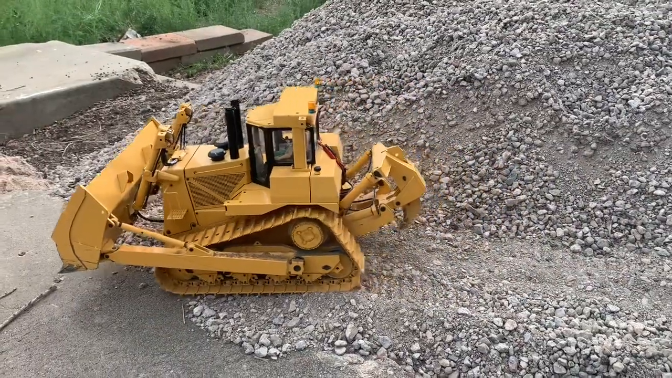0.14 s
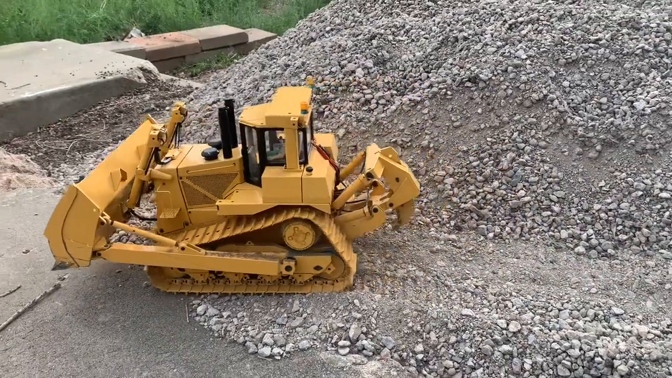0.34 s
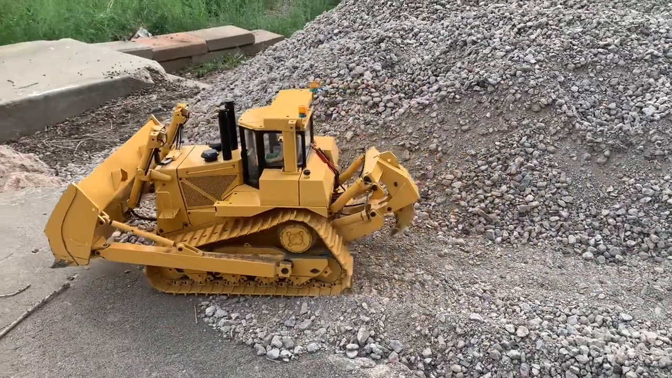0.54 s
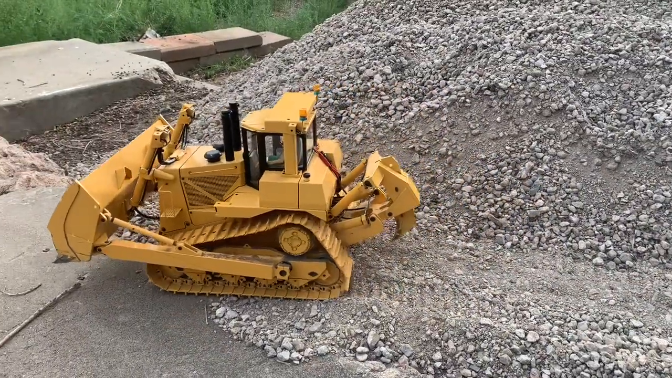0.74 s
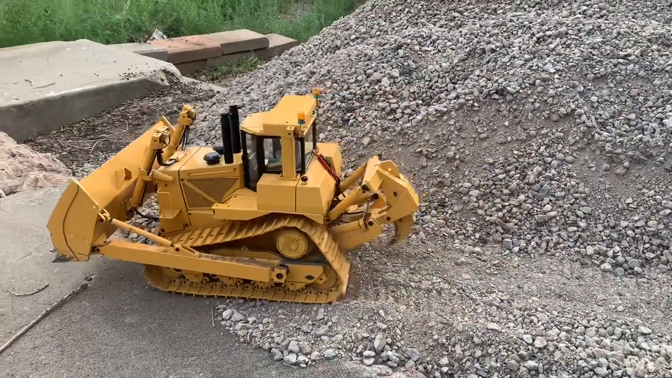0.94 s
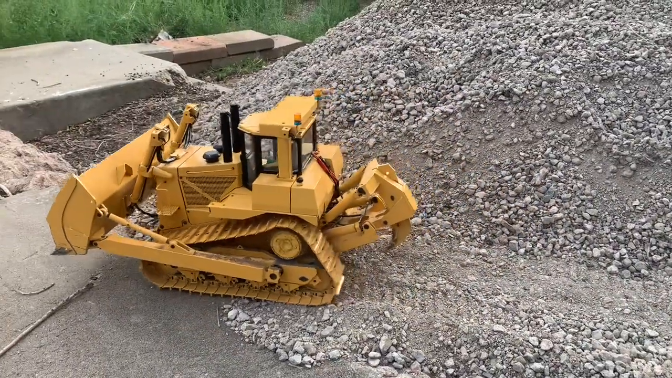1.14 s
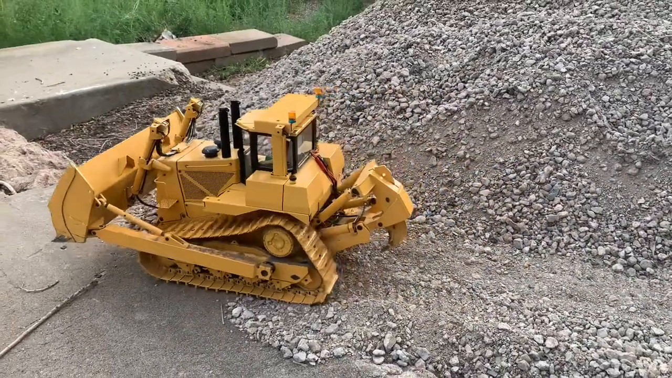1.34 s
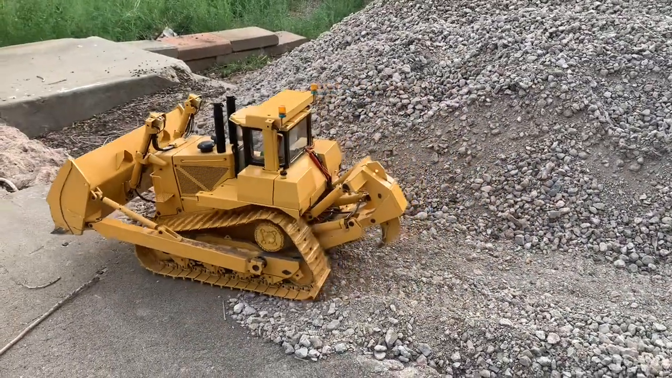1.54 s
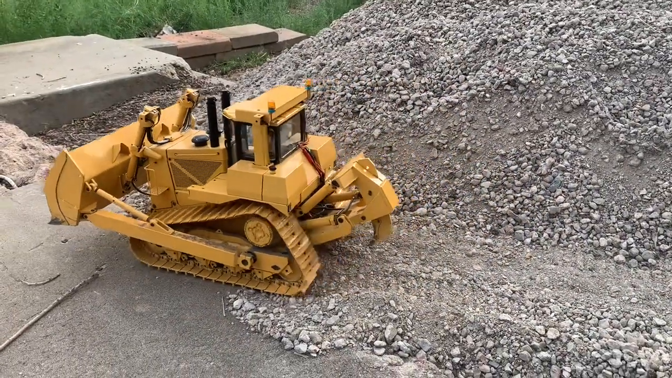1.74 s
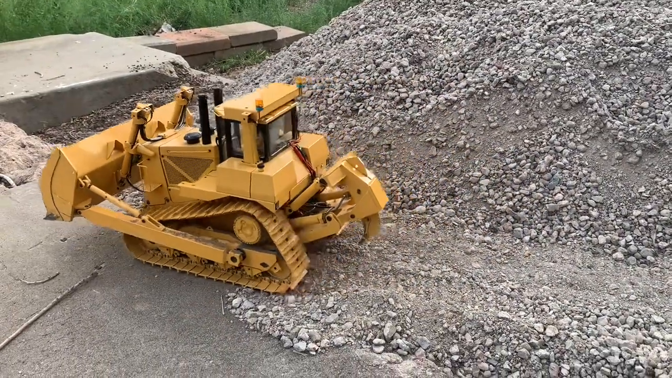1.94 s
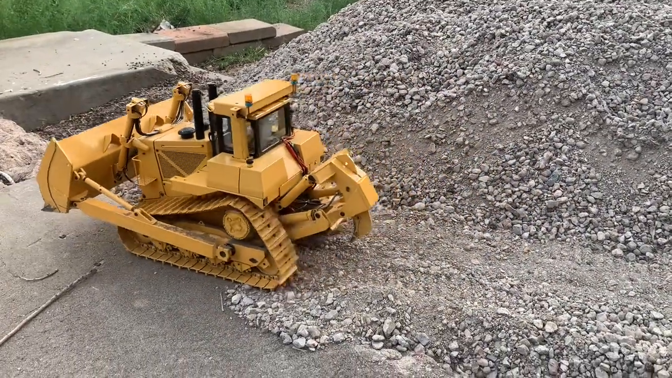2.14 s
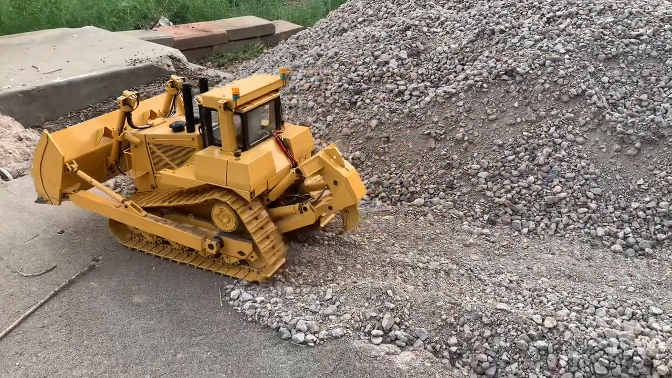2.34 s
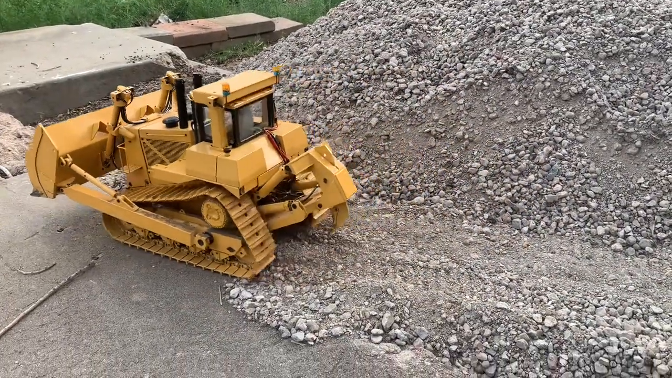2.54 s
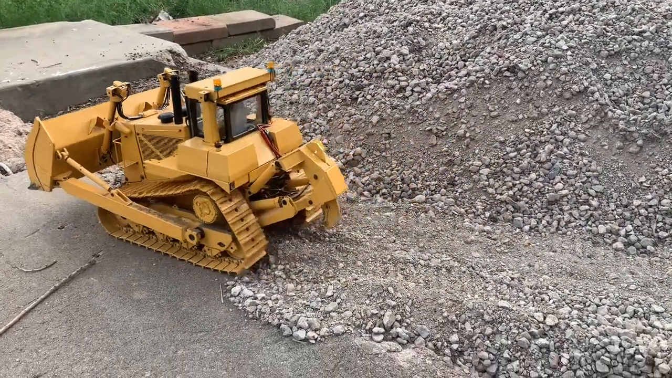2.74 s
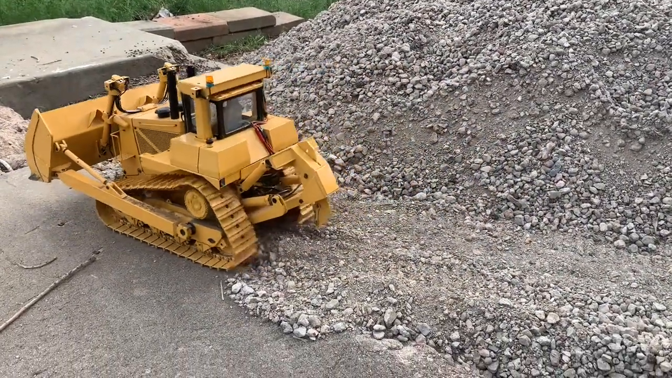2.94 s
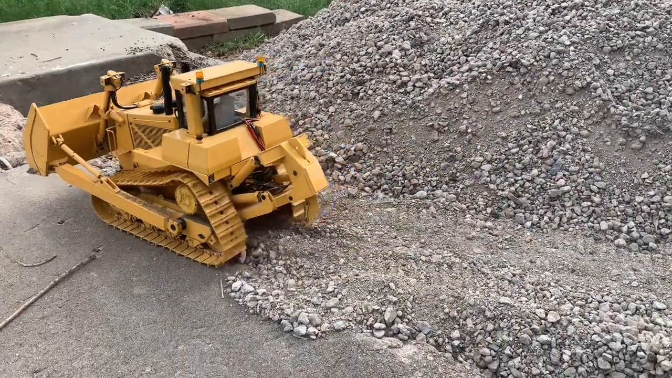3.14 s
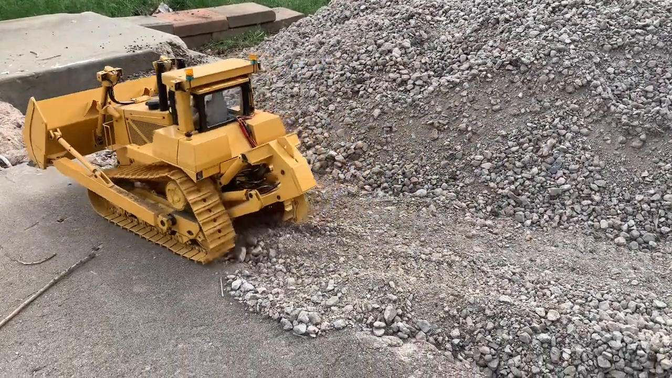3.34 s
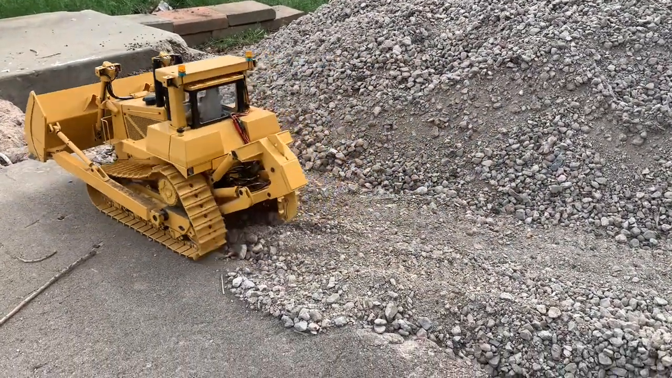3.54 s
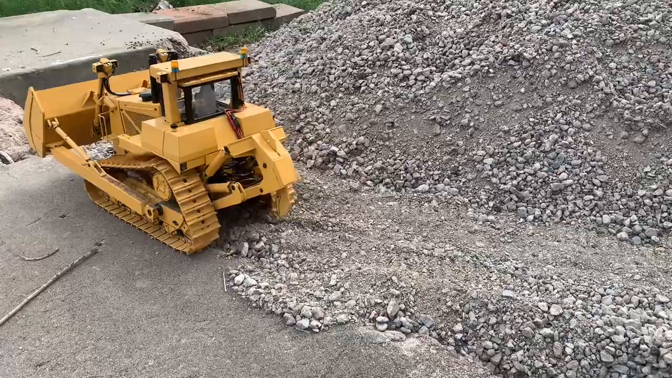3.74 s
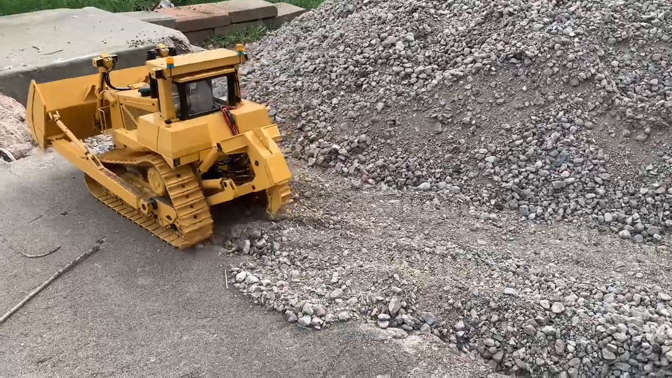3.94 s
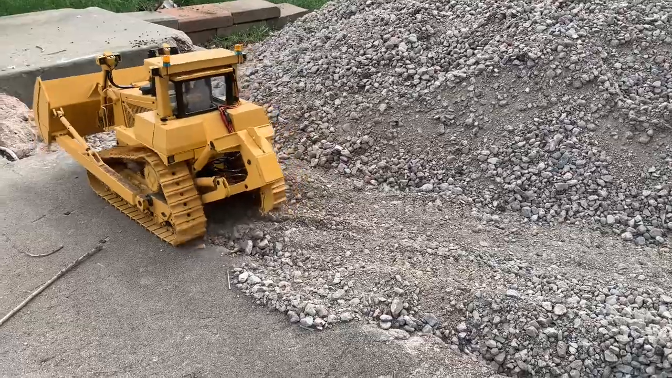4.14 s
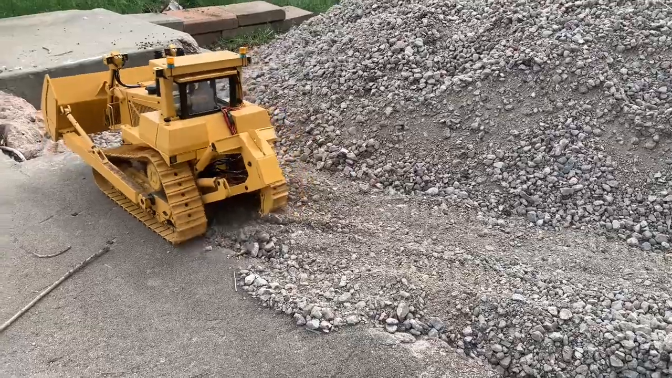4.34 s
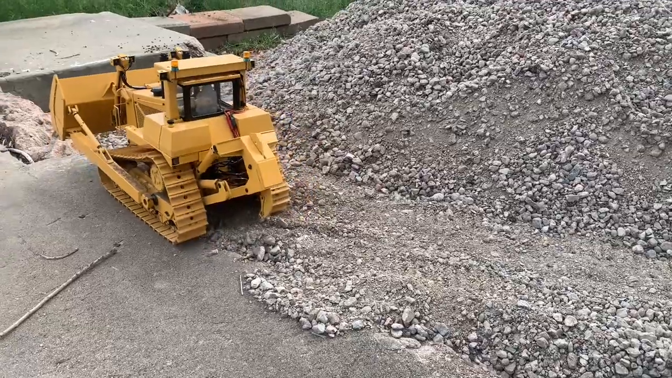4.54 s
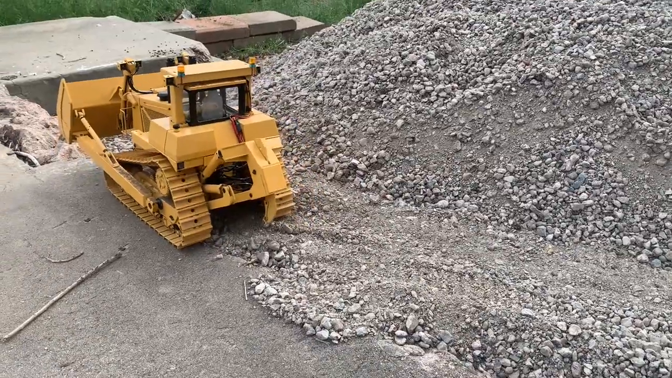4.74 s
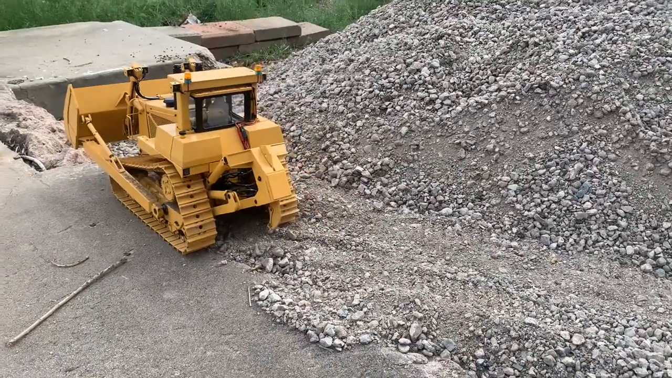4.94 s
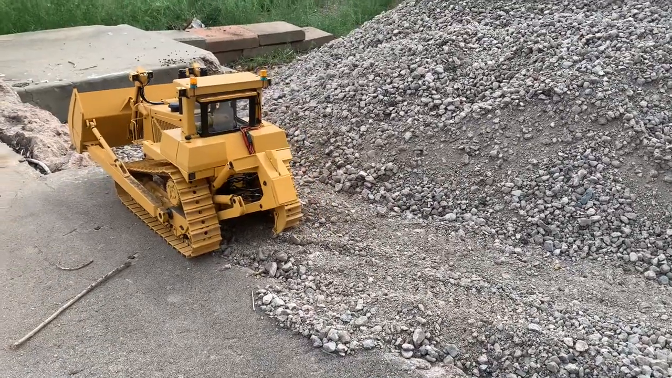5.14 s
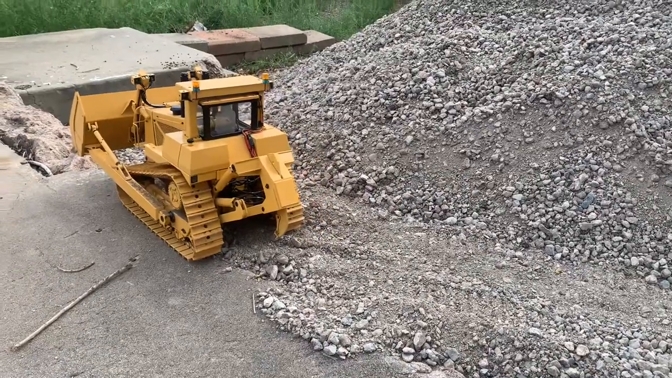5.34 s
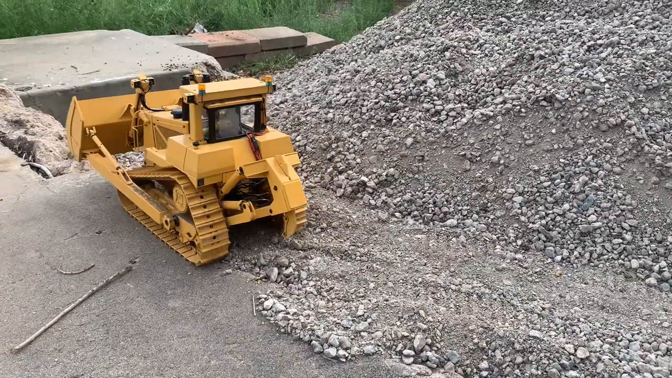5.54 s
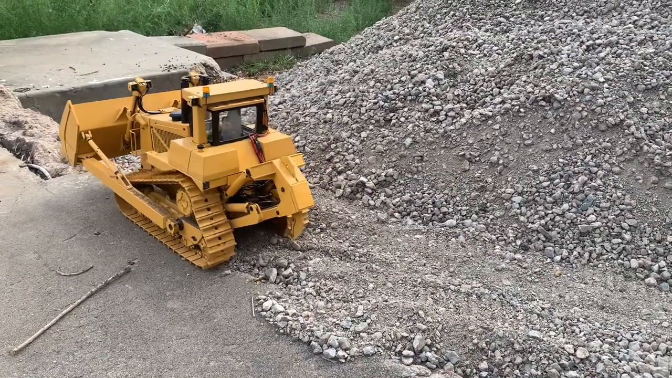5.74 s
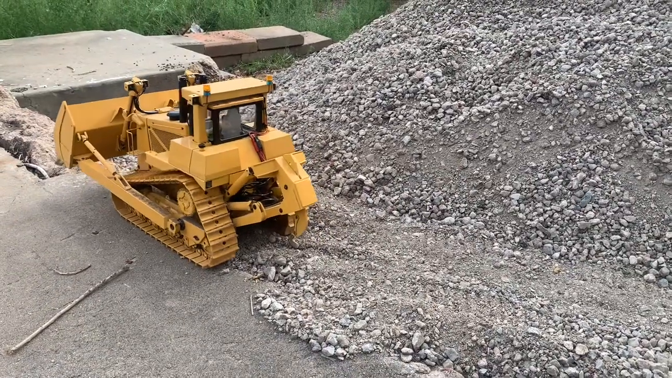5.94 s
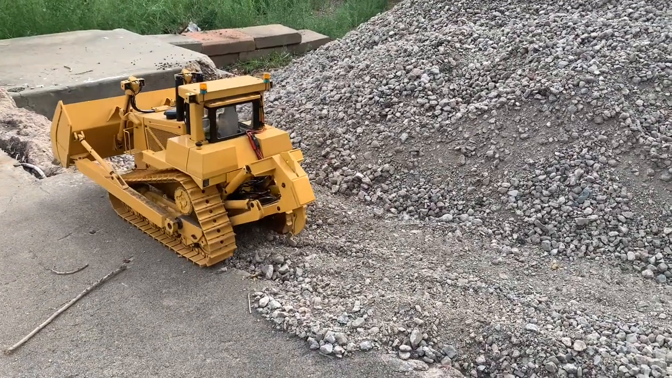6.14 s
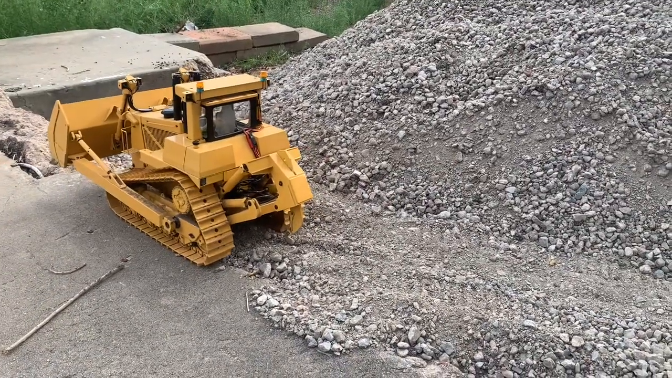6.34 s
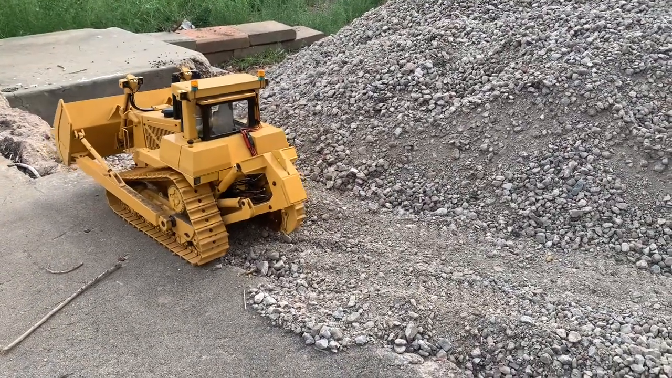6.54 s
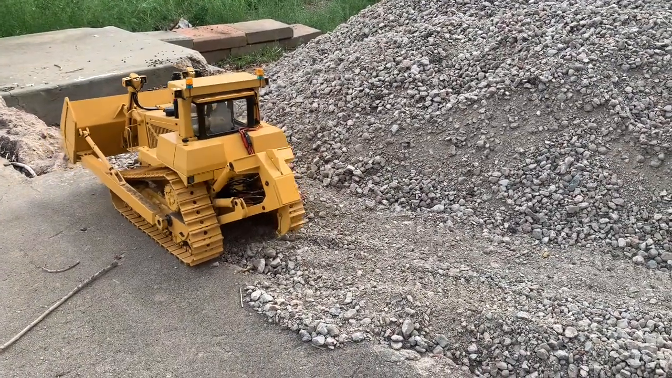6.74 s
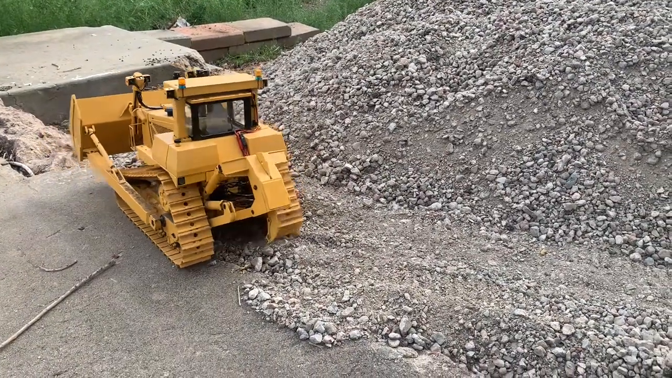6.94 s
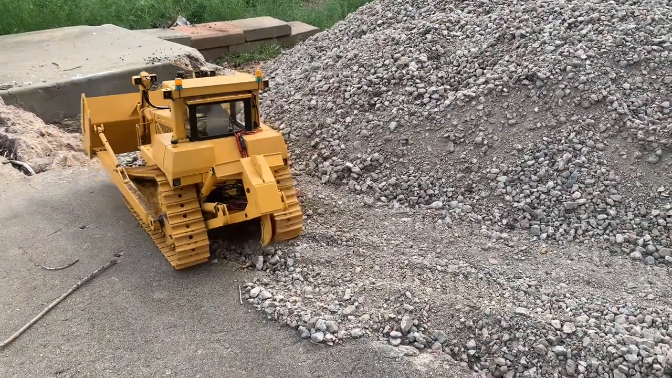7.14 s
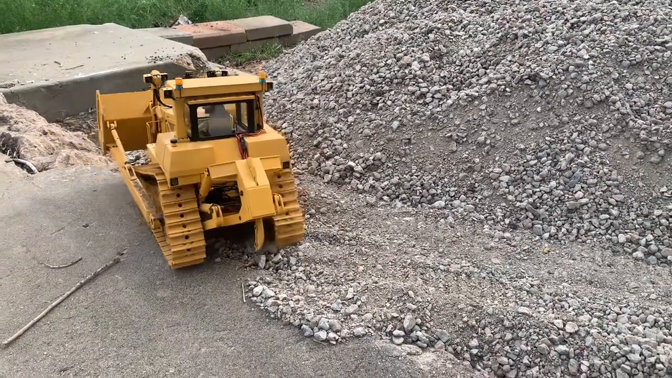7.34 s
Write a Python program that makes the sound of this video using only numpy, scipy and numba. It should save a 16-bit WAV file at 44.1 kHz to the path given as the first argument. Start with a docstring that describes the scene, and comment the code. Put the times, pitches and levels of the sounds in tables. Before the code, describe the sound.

A small model bulldozer's gears whine and rattle as it grinds over gravel, stops, nudges forward, pauses again, then turns with a higher, racing whir.

```python
"""Gears whine and rattle in a metal hull: a model bulldozer climbs loose gravel, pauses, nudges forward, then turns.
Meshing teeth sing as sines that sag under load; when loose, they shake the hull with impact noise and even taps.
Tracks grind as grains of noise through ringing frames, with knocks, short bursts and a skid in the turn.
Behind them a pump hums on its shaft orders and idles in the pauses, a controller whistles thinly,
and light wind rumbles as low coloured noise; the machine is a metre or two from a phone."""
import sys
import numpy as np
from scipy import signal
from scipy.fft import rfft, irfft, next_fast_len
from scipy.io import wavfile
from scipy.ndimage import uniform_filter1d
from numba import njit

SR = 44100
rng = np.random.default_rng(int(sys.argv[2]) if len(sys.argv) > 2 else 0)


def persist_wave(psi):
    """Save psi, clipped to +-1, as 16-bit WAV."""
    counts = np.round(np.clip(psi, -1, 1) * 32767).astype(np.int16)
    wavfile.write(sys.argv[1], SR, np.atleast_2d(counts).T)


N = 325899
LEFT_RIGHT = np.array([[1], [-1]])

# the machine turns its back: (t/s, share heard from behind 0-1, left minus right level/dB before each layer's offset)
PATH = [(0, 0, 2.5), (.55, 0.15, 1), (1.1, 0.06, 4), (2.3, 0.48, 3.5), (3.0, 0.6, 3), (3.7, 0.79, 2),
        (7.39, 1, 2.5)]
# base level of each drive layer, before moves and trims:
# (level/dB side-on at cruising speed, dB per octave of speed, dB added from behind, dB added at rest)
GEAR_LEVEL = (-29, 5.5, -6.5, -6)
OVERTONE_LEVEL = (-42.5, 11, -5, -30)
SCRAPE_LEVEL = (-43, 5.5, -3, -7.5)
HISS_LEVEL = (-42, 9, -7, -11)
CRUISE_HZ = 1610  # tooth rate
LINK_THROB_DB, GEAR_FLICKER_DB = 1.2, 1
MIDDLE_WOBBLE, MIDDLE_TAP_DB = .2, -8  # depth 0-1 and relative tap level of the middle wheel
# the hull's loudest panel resonance: it sounds lower from behind and follows slow gears down
HULL_HZ, HULL_BACK_HZ, HULL_FOLLOW, HULL_DROP_HZ = 1599, 95, 0.47, 148


def machine():
    """One speed drives gears, tracks and pump; one heading shades the drive."""
    mesh_hz, moving, loose_clean, stumble, move_db = drive()
    move_gears_db, move_scrape_db, move_hiss_db, move_overtone_db = move_db
    rear, pan_db = curve(PATH)
    rear = np.clip(rear, 0, 1)
    bite_db, clean, fast, slow = contact(mesh_hz, loose_clean)
    # the load rises as each track link bites
    links = turn(mesh_hz / 160 * (1 + 0.133 * walk(6.6)))
    mesh = turn(mesh_hz * (1 + 0.0105 * np.sin(links) + 0.004 * walk(28) + 0.009 * walk(170)))
    fast_wheel, middle_wheel, slow_wheel = mesh / 15, mesh / 11.5, mesh / 45
    # off-centre wheels press the teeth harder, and push them ahead, once a turn
    wobble = np.exp(fast * np.cos(fast_wheel) + slow * np.cos(slow_wheel) - (fast ** 2 + slow ** 2) / 2)
    twist = fast * np.sin(fast_wheel) / 2 + slow * np.cos(slow_wheel)
    twist = twist + stumble * unit(walk(200) + walk(70))
    taps = tap(fast_wheel) + undb(MIDDLE_TAP_DB) * tap(middle_wheel)
    knocking = wobble ** 0.38 * (1 + MIDDLE_WOBBLE * np.cos(middle_wheel))
    gears_db, overtone_db, scrape_db, hiss_db = (
        loudness(law, mesh_hz, rear, moving)
        for law in (GEAR_LEVEL, OVERTONE_LEVEL, SCRAPE_LEVEL, HISS_LEVEL))
    flicker_db = moving * (LINK_THROB_DB * np.sin(links) + GEAR_FLICKER_DB * walk(45))
    gears_db = gears_db + move_gears_db + bite_db + brief_dips() + flicker_db
    hull_drop_hz = np.clip(HULL_FOLLOW * (CRUISE_HZ - mesh_hz), 0, HULL_DROP_HZ)
    hull_hz = HULL_HZ - moving * (HULL_BACK_HZ * rear + hull_drop_hz)
    return (gears(mesh, wobble, twist, knocking, taps, clean, gears_db, moving * pan_db, hull_hz)
            + overtones(mesh, wobble, overtone_db + move_overtone_db)
            + tracks(wobble, rear, scrape_db + move_scrape_db, hiss_db + move_hiss_db)
            + skid(wobble) + inner_track(pan_db) + pump(moving))


# the three moves (climb, nudge, turn): (start t/s, stop t/s, run-down/s, added gears level/dB, scrape level/dB,
# hiss level/dB, overtones level/dB, share of clean whine between bites 0-1 at full speed)
MOVES = [(-.3, 4.49, .17, 0, 0, 0, 0, 0.32), (5.25, 5.76, .24, -4.5, 3, 1, 3.5, 0.2),
         (6.27, 7.5, .2, -5.5, 0.5, 0, 0, 0.1)]
# drive speed aimed at in each move: (t/s, tooth rate f/Hz)
CLIMB = [(0, 1570), (.3, 1595), (.42, 1575), (.62, 1605), (.95, 1535), (1.05, 1560), (1.19, 1535),
         (1.27, 1635), (1.33, 1595), (1.43, 1685), (1.5, 1645), (1.54, 1570), (1.58, 1620), (1.67, 1440),
         (1.75, 1545), (1.85, 1555), (2.01, 1615), (2.1, 1535), (2.3, 1520), (2.4, 1400), (2.6, 1385),
         (2.73, 1465), (2.84, 1420), (2.91, 1325), (3.13, 1380), (3.3, 1350), (3.4, 1480), (3.5, 1390),
         (3.72, 1345), (3.93, 1400), (4.02, 1320), (4.12, 1250), (4.2, 1295), (4.48, 1295)]
NUDGE = [(5.3, 740), (5.38, 820), (5.44, 1000), (5.47, 1035), (5.5, 995), (5.62, 1165), (5.67, 1340),
         (5.72, 1210), (5.79, 910)]
TURN = [(6.37, 930), (6.42, 1040), (6.46, 1290), (6.5, 1570), (6.53, 1790), (6.58, 1960), (6.7, 1950),
        (6.82, 1760), (7.05, 1770), (7.39, 1720)]
SPIN_UP_S, CRAWL_HZ = .14, 906.5  # the tooth rate goes from a crawl to its curve and back to the crawl
# the teeth stumble below a smooth running speed and when the speed surges
STUMBLE_RAD, SMOOTH_HZ, SURGE_HZ_PER_S = .9, 1330, 6000


def drive():
    """Motor speed: tooth rate, motion 0-1, share of clean whine, stumble in radians, and layer dB of each move."""
    moving, *extra_db, clean = sum(np.outer([1, *character], swell(start, stop, SPIN_UP_S, run_down))
                                   for start, stop, run_down, *character in MOVES)
    speed_hz, = curve(CLIMB + NUDGE + TURN)
    mesh_hz = CRAWL_HZ + moving * (speed_hz - CRAWL_HZ)
    surge = uniform_filter1d(np.abs(np.gradient(mesh_hz)) * SR, SR // 10) / SURGE_HZ_PER_S
    crawl = np.maximum(SMOOTH_HZ - mesh_hz, 0) / (SMOOTH_HZ - CRAWL_HZ)
    stumble = STUMBLE_RAD * np.minimum(crawl + surge ** 2, 1)
    return mesh_hz, moving, clean * moving ** 5, stumble, extra_db


# the tracks bite and the loaded gears sing out: (start t/s, stop t/s, added level/dB, share of clean whine 0-1,
# wobble of the fast wheel 0-1, wobble of the slow wheel 0-1)
BITES = [(0.054, 0.31, 5, 0.37, 0.63, 0.1), (0.32, 0.707, 3, 0.52, 0.33, 0.08),
         (1.194, 1.611, 5.5, 0.89, 0.31, 0.4), (2.426, 2.846, 2, 0.73, 0.2, 0.18),
         (3.374, 3.8, 3.5, 0.77, 0.2, 0.32), (3.824, 4, 4.5, 0.82, 0.3, 0.21),
         (4.287, 4.46, 0, 0.43, 0.2, 0.24), (5.637, 5.684, 7, 0.8, 0.1, .3),
         (6.433, 6.497, 7, 0.72, 0.4, 0)]
BITE_RISE_S, BITE_FALL_S = 0.025, 0.04
LOOSE_WOBBLE, SLOW_WOBBLE = 0.26, 0.16  # wobble 0-1 of the fast and of the slow wheel between bites
RESTART_GRIP = .48  # extra share of clean whine (0-1) while the turn gets under way
UNLOADED_HZ, RACING_DB_PER_HZ = 1655, 0.005  # above this tooth rate the gears run light and grow quieter


def contact(mesh_hz, loose_clean):
    """Teeth press harder in a bite and less when racing: extra dB, clean share, fast and slow wobble."""
    biting, *bite = sum(np.outer([1, *character], swell(start, stop, BITE_RISE_S, BITE_FALL_S))
                        for start, stop, *character in BITES)
    bite_db, clean, fast, slow = bite / np.maximum(biting, 1)
    loose = np.maximum(1 - biting, 0)
    # the teeth press as the drive restarts
    grip = RESTART_GRIP * swell(MOVES[2][0] + SPIN_UP_S / 2, BITES[-1][0], 0.04, 0.028)
    clean = np.clip(clean + loose * loose_clean + grip, 0, 1)
    racing_db = RACING_DB_PER_HZ * np.maximum(mesh_hz - UNLOADED_HZ, 0)
    return bite_db - racing_db, clean, fast + loose * LOOSE_WOBBLE, slow + loose * SLOW_WOBBLE


def loudness(law, mesh_hz, rear, moving):
    """Level in dB of a drive layer: louder with speed, shaded from behind, weaker at rest."""
    cruise_db, octave_db, back_db, rest_db = law
    return cruise_db + octave_db * np.log2(mesh_hz / CRUISE_HZ) + back_db * rear + rest_db * (1 - moving)


# tint of the hull on rattle and taps: (f/Hz, relative level/dB per Hz)
HULL_COLOUR = [(700, 8.5), (1000, -12.5), (1300, -2), (1730, -1.5), (1890, -13), (2020, 0), (2200, -22),
               (3000, 3)]
TAP_SHARE = .45  # power share of even taps in the loose sound, 0-1


def gears(mesh, wobble, twist, knocking, taps, clean, level_db, pan_db, hull_hz):
    """Teeth in firm contact sing; loose ones rattle the hull and tap it evenly, once to each turn of a wheel."""
    whine = unit(np.sin(mesh + twist) * undb(0.82 * walk(130)) * wobble)

    def shake():
        return colour(ring(grains(16000, 0.13) * knocking, hull_hz + 20, 580), HULL_COLOUR)
    rattle = spread(shake, side_db=-10.0)
    tapping = colour(ring(taps, hull_hz + 30, 340), HULL_COLOUR)
    loose = np.sqrt(1 - TAP_SHARE) * rattle + np.sqrt(TAP_SHARE) * tapping
    sound = bounded(np.sqrt(clean) * whine + np.sqrt(1 - clean) * loose)
    return sound * undb(level_db - 0.5 + (pan_db - 3.0) * LEFT_RIGHT / 2)


TAP_JITTER, TAP_SCATTER_DB = .007, 1.2  # timing spread in turns, and spread of strength


def tap(wheel):
    """One tap to each turn of a wheel, nearly even in time and strength."""
    turns = np.floor(wheel / (2 * np.pi) + TAP_JITTER * walk(60))
    return np.diff(turns, prepend=turns[0]) * undb(TAP_SCATTER_DB * walk(100))


DIP_DB, DIP_S = -8, .018  # depth and length of the dip


def brief_dips():
    """Brief dip in dB of the gear level before each short hull-pitched pulse."""
    return DIP_DB * sum(swell(s - DIP_S, s, DIP_S / 2, PULSE_PEAK_S) for s, _ in PULSES)


SWING_LIMIT = 2.1  # where the panel's swing levels off, in units of its rms


def bounded(x):
    """A panel can only swing so far: the strongest bursts level off at a like height; rms 1."""
    envelope = np.abs(signal.hilbert(unit(x), next_fast_len(N))[..., :N])
    swing = envelope / SWING_LIMIT
    return unit(x / (1 + swing ** 4) ** .25)


# overtones of the tooth rate: (multiple of the tooth rate, relative level/dB)
OVERTONES = [(2, 0), (3, -1), (4, 0), (5, -3), (6, -5), (7, -8)]
# what the gearbox lets out: (f/Hz, relative level/dB)
GEARBOX = [(1600, -3), (2000, 1), (2650, 8), (2950, 1), (3200, 2), (3520, 0), (3850, -4), (4500, 4),
           (4900, -1), (5350, -3.5), (5750, -5), (6400, 2), (6950, -4.5), (7500, -9), (8800, -35)]
BACKLASH_RAD, BREAK_UP_DB = 1.03, 2.8  # play between the teeth, and overtone flicker, per wandering curve


def overtones(mesh, wobble, level_db):
    """The upper whine glides with the teeth, blurred by backlash and broken into short grains."""
    def partial(k):
        play = BACKLASH_RAD * (walk(220) + walk(60))
        return np.sin(k * mesh + play) * undb(BREAK_UP_DB * (walk(22) + walk(150)))

    def upper_whine():
        partials = sum(undb(db) * partial(k) for k, db in OVERTONES)
        return colour(np.sqrt(wobble) * partials, GEARBOX)
    return spread(upper_whine, side_db=-2.5) * undb(level_db)


# spectra of the grinding and of the finer grit: (f/Hz, relative level/dB per Hz)
SCRAPE = [(300, -6), (600, 1.5), (900, -3), (1200, 0.5), (1950, 9.5), (2200, 1), (2500, 10), (3300, -6.5),
          (4000, -13), (4800, -30), (7000, -79.5)]
HISS = [(2800, -46.5), (3800, 2), (4700, 2), (5600, -2), (6400, -0.5), (7200, -8), (8100, -5.5),
        (8900, -36), (10200, -13.5), (12000, -42.5), (15500, -18.5)]
# track frames ringing, from the side and from behind: (f/Hz, width f/Hz before narrowing, relative level/dB)
SIDE_MODES = [(2540, 170, -8.5), (3165, 880, 3.5), (3466, 98, 0.5), (4023, 120, -3.5), (4960, 110, -5),
              (6240, 520, -6)]
REAR_MODES = [(2790, 90, -8.5), (3076, 210, 4.5), (3580, 460, 0.5), (4610, 410, -3), (5220, 250, -8),
              (6860, 520, -8), (7690, 500, -14.5)]
FRAME_DRIFT = .012  # the ringing drifts by this share as the links shift


def tracks(wobble, rear, scrape_db, hiss_db):
    """Links and grit grind in step with the drive and ring the track frames."""
    throb = wobble ** 0.69

    def grind():
        return colour(grains(9000, 3.05) * throb * undb(1.0 * walk(30)), SCRAPE)

    def grit():
        return colour(grains(16000, 0.75) * throb * undb(2.0 * walk(25)), HISS)

    def mode(hz, width, db):
        centre = hz * (1 + FRAME_DRIFT * walk(5))
        return undb(db + 2.3 * walk(11)) * ring(grains(6000, 1.8) * throb, centre, 0.68 * width)
    scrape = spread(grind, side_db=-5.5)
    hiss = spread(grit, side_db=-3.5)
    side_on = unit(sum(mode(*row) for row in SIDE_MODES))
    rear_on = unit(sum(mode(*row) for row in REAR_MODES))
    frames = np.sqrt(1 - rear) * side_on + np.sqrt(rear) * rear_on
    frames_db = (scrape_db + hiss_db) / 2 + 1.5
    return scrape * undb(scrape_db + 3.0) + hiss * undb(hiss_db - 2.5) + frames * undb(frames_db)


# the tracks skid through the turn: (start t/s, stop t/s)
SKID_S = (6.45, 7.5)
# what they ring with: (settled f/Hz, width f/Hz, level/dB before flicker and throb)
SKID_MODES = [(3500, 400, -48.5), (4570, 280, -52), (5080, 260, -54)]
SKID_LIFT, SKID_SETTLE_S = .04, .3  # the ringing starts higher by this share and settles


def skid(wobble):
    """Through the turn the tracks scour sideways over the grit and ring in rough bands that start high and settle."""
    start, stop = SKID_S
    lift = 1 + SKID_LIFT * np.exp(-np.maximum(np.arange(N) / SR - start, 0) / SKID_SETTLE_S)

    def scour():
        return sum(undb(db + 2.4 * walk(18)) * ring(grains(5000, 2.7) * wobble, hz * lift, width)
                   for hz, width, db in SKID_MODES)
    return spread(scour, side_db=-0.5) * swell(start, stop, 0.044, 0.13)


# the inner track's slower gears in the turn: (start t/s, stop t/s, first f/Hz, last f/Hz, level/dB before panning)
INNER_TRACK = (6.72, 7.5, 1559, 1494, -41)


def inner_track(pan_db):
    """The slower drive's whine gathers as the machine pivots."""
    start, stop, first_hz, last_hz, db = INNER_TRACK
    tooth_hz, = curve([(start, first_hz), (stop, last_hz)])
    mesh = turn(tooth_hz * (1 + .009 * walk(28) + .02 * walk(170)))
    whine = unit(np.sin(mesh) * undb(1.4 * walk(120))) * swell(start, stop, 0.29, 0.091)
    return whine * undb(db + (pan_db - 5.5) * LEFT_RIGHT / 2)


# the chassis knocks as it tips over stones: (t/s, level/dB before decay, f/Hz, width f/Hz, decay/s)
KNOCKS = [(0.871, -31, 380, 520, .009), (0.876, -28, 190, 260, .011), (1.795, -37, 400, 560, .011),
          (1.815, -34.5, 350, 480, .018), (1.903, -39, 280, 220, .026), (3.379, -30, 430, 460, .008),
          (6.793, -35.5, 340, 460, .013)]
# short bursts around the second overtone of the whine, near 2.6-3 kHz, beside sharp snaps, near 5 kHz:
# (t/s, level/dB before decay, f/Hz, width f/Hz, decay/s)
HIGH_BURSTS = [(1.679, -44, 5000, 3800, .004), (2.945, -41, 3000, 2200, .012),
               (3.377, -40.5, 5400, 3600, .01), (3.586, -38, 2650, 400, .012),
               (4.008, -39, 2600, 450, .012), (4.168, -43, 5000, 3800, .004),
               (4.215, -45, 5000, 3800, .004)]
# short hull-pitched pulses where the gear sound rises again: (t/s, approximate peak level/dB)
PULSES = [(0.0827, -21), (1.064, -22.5), (1.3766, -21), (3.613, -23.5), (3.836, -25), (6.45, -28)]


def short_events():
    """Knocks of the chassis, high bursts and snaps of resonant noise, and short hull-pitched pulses."""
    blows = sum(undb(db) * burst(s, hz, width, decay) for s, db, hz, width, decay in KNOCKS + HIGH_BURSTS)
    pulses = sum(undb(db) * hull_pulse(s) for s, db in PULSES)
    return blows + pulses


def burst(s, hz, width, decay):
    """Resonant noise that starts at once and dies away."""
    age = np.maximum(np.arange(N) / SR - s, 0)
    return ring(rng.standard_normal(N), hz, width) * np.exp(-age / decay) * (1 - np.exp(-8 * age / decay))


PULSE_PEAK_S = .002


def hull_pulse(s):
    """A short sine pulse at the hull's pitch, lower from behind; peak near 1."""
    age = np.maximum(np.arange(N) / SR - s, 0) / PULSE_PEAK_S
    panel_hz = HULL_HZ - HULL_BACK_HZ * curve(PATH)[0]
    return age * np.exp(1 - age) * np.sin(2 * np.pi * panel_hz * age * PULSE_PEAK_S)


# pump speed: (t/s, shaft f/Hz)
PUMP_SPEED = [(0, 32.7), (.8, 35.3), (1.2, 35.75), (1.6, 35.8), (2.0, 35.2), (2.9, 35.1), (4.5, 33.4),
              (4.9, 30.5), (7.39, 31)]
# pump tones: (multiple of the shaft rate, relative level/dB, drift dB per s)
PUMP_ORDERS = [(5, -12, 0), (7, -7, 0), (8, -16, 0), (10, -16, 0), (14, -12, -1), (16, -12, 0),
               (17, 0, -.6), (18, -6, 1), (19, -7, .7), (20, -12, .7), (21, -7, .5), (23, -17, 1)]
# spectrum of the rush: (f/Hz, relative level/dB per Hz)
PUMP_BODY = [(110, -13.5), (250, -9.5), (340, -5.5), (480, -5), (570, -1), (640, 1.5), (740, -1), (810, -9),
             (880, -14.5), (1200, -61)]
PUMP_DB, PUMP_FADE_DB_PER_S, PUMP_REST_DB = -37, 2.5, -8  # level at the start while driving, fade, change at rest
PUMP_LAG_S = 0.15  # the pump follows the drive a little late


def pump(moving):
    """A hum on the shaft orders fades steadily; a pulsing rush takes over at low load."""
    shaft_hz, = curve(PUMP_SPEED)
    t = np.arange(N) / SR
    running = np.interp(t - PUMP_LAG_S, t, moving)
    load_db = PUMP_DB - PUMP_FADE_DB_PER_S * t + PUMP_REST_DB * (1 - running)
    shaft = turn(shaft_hz * (1 + 0.0008 * walk(13)))
    tones = [undb(db + drift * t + walk(6.8)) for _, db, drift in PUMP_ORDERS]
    chord = sum(tone * np.sin(k * shaft + 2 * np.pi * rng.random())
                for tone, (k, _, _) in zip(tones, PUMP_ORDERS))
    hum = unit(chord / np.linalg.norm(tones, axis=0))

    def pulse():
        return colour(rng.standard_normal(N) * (1 + 0.35 * np.cos(3 * shaft)), PUMP_BODY)
    rush = spread(pulse, side_db=-9.5)
    firm = np.clip((load_db + 53) / 9, .05, .68)  # power share of the hum
    return (np.sqrt(firm) * hum + np.sqrt(1 - firm) * rush) * undb(load_db)


# spectrum of the whirr: (f/Hz, relative level/dB per Hz)
IDLE = [(120, -2.5), (200, 1.5), (263, -8.5), (365, -8.5), (408, -16.5), (628, -6), (863, -25.5),
        (1630, 1.5), (2210, -8.5), (2390, -5), (2530, -23), (2770, -36), (3000, -19), (3900, -42),
        (6600, -120)]
# thin whines in the pauses: (start t/s, stop t/s, first f/Hz, last f/Hz, level/dB before flicker)
COAST = [(4.58, 5.271, 3020, 2580, -54.5), (5.86, 6.283, 3030, 2990, -62)]
COAST_FLICKER_DB = 1.8
IDLE_FADE_DB_PER_S = 0.5  # the whirr and case die down from the first stop on


def idle():
    """What stays when the tracks stop: a soft whirr, a ringing case and thin whines."""
    flutter = 1 + 0.45 * np.cos(turn(160 + 6 * walk(4)))
    whirr = spread(lambda: colour(grains(6000, 0.83) * flutter, IDLE), side_db=-8.0) * undb(-46)
    case = ring(rng.standard_normal(N), 2351, 81) * undb(-49)
    case = case + ring(rng.standard_normal(N), 1020, 280) * undb(-56)

    def thin_whine(start, stop, first_hz, last_hz, db):
        glide_hz, = curve([(start, first_hz), (stop, last_hz)])
        tone = unit(np.sin(turn(glide_hz + 22 * walk(200))))
        return tone * undb(db + COAST_FLICKER_DB * walk(40)) * swell(start, stop, 0.051, 0.057)
    coast = sum(thin_whine(*row) for row in COAST)
    since_stop = np.maximum(np.arange(N) / SR - MOVES[0][1], 0)
    return (whirr + case) * undb(-IDLE_FADE_DB_PER_S * since_stop) + coast


# speed controller whistling at low throttle: (start t/s, stop t/s, level/dB before flicker)
WHISTLES = [(4.565, 4.72, -76), (4.953, 5.584, -72), (5.73, 6.297, -86)]
CHOPPER_HZ = 7980


def controller():
    """The speed controller's thin whistle at low throttle, alike on both sides."""
    chopping = sum(undb(db) * swell(start, stop, .03, 0.031) for start, stop, db in WHISTLES)
    return unit(np.sin(turn(CHOPPER_HZ + 7 * walk(60)))) * chopping * undb(1.5 * walk(25))


# spectrum of the rumble: (f/Hz, relative level/dB per Hz)
WIND_COLOUR = [(12, -46.5), (20, -32), (38, -7), (64, 3.5), (88, -2.5), (146, -8.5), (178, -15.5),
               (201, -18.5), (280, -13.5), (360, -31.5), (620, -120)]
# gusts: (centre t/s, added level/dB, half length/s to where the dB fall to 1/e)
GUSTS = [(0.596, 10, 0.078), (3.065, 10, 0.035), (3.703, 6, 0.12), (4.082, 6, 0.055), (4.327, 6.5, 0.07),
         (5.79, 2, 0.21), (6.693, 2.5, 0.066), (6.97, 5.5, 0.069), (7.294, 7, 0.044)]
WIND_DB, WIND_RISE_DB_PER_S, WIND_WANDER_DB = -51.5, 0.86, 0.54  # level at the start, rise, spread


def wind():
    """Wind on the microphone: low rumble that freshens slowly and swells with the gusts."""
    t = np.arange(N) / SR
    gust_db = sum(db * np.exp(-((t - s) / length) ** 2) for s, db, length in GUSTS)
    level_db = WIND_DB + WIND_RISE_DB_PER_S * t + WIND_WANDER_DB * walk(9.9) + gust_db
    return spread(lambda: colour(rng.standard_normal(N), WIND_COLOUR), side_db=-13.0) * undb(level_db)


def undb(db):
    """Decibels to gain."""
    return 10 ** (np.asarray(db) / 20)


def unit(x):
    """Scale to rms 1."""
    return x / np.sqrt(np.mean(x ** 2))


def curve(rows):
    """The columns of a table, joined by straight lines in time."""
    s, *columns = np.transpose(rows)
    return [np.interp(np.arange(N) / SR, s, c) for c in columns]


def across(points):
    """(f/Hz, value) points on the bins of a spectrum."""
    hz, value = np.transpose(points)
    return np.interp(np.log(np.arange(N // 2 + 1) * SR / N + 1), np.log(hz + 1), value)


def colour(x, points):
    """Filter a sound by (f/Hz, level/dB) points; rms 1."""
    return unit(irfft(rfft(x) * undb(across(points)), N))


def walk(rate):
    """Smooth random wandering with rms 1, about rate new values a second."""
    k = max(int(SR / rate), 2)
    return unit(uniform_filter1d(np.repeat(rng.standard_normal(N // k + 1), k), k)[:N])


def turn(hz):
    """Angle of something that turns hz times a second."""
    return 2 * np.pi * np.cumsum(hz) / SR


def swell(start, stop, rise, fall):
    """An envelope 0-1: rises from start, holds, and falls from stop."""
    t = np.arange(N) / SR
    return np.clip(np.minimum((t - start) / rise, 1 - (t - stop) / fall), 0, 1)


@njit
def svf(x, hz, width):
    """State-variable band-pass whose centre may move."""
    y, b, l = np.empty(len(x)), 0., 0.  # output, band and low states
    for i in range(len(x)):
        g, k = np.tan(np.pi * hz[i] / SR), width / hz[i]
        v = (b + g * (x[i] - l)) / (1 + g * (g + k))
        b, l, y[i] = 2 * v - b, l + 2 * g * v, k * v
    return y


def ring(x, hz, width):
    """A resonance with steep skirts, two equal band-passes in a row; rms 1."""
    centre = hz * np.ones(N)
    return unit(svf(svf(x, centre, float(width)), centre, float(width)))


def grains(rate, spread_db):
    """Dense tiny impacts, rate a second, most weak and a few strong; rms 1."""
    hit = rng.random(N) < rate / SR
    return unit(hit * rng.standard_normal(N) * undb(spread_db * np.minimum(rng.exponential(size=N), 5)))


def spread(make, side_db):
    """A sound plus its scattered part, which differs left and right."""
    return make() + undb(side_db) * make() * LEFT_RIGHT


# the two microphone ports: (f/Hz, phase in radians by which left leads)
PORT_PHASE = [(30, -0.5), (700, 0.2), (1400, -0.07), (2330, 2), (4910, 1.82), (6200, -0.5), (6900, 1.5),
              (8350, -4), (10100, -2.5), (15000, -10)]
# and (f/Hz, left minus right level/dB)
PORT_BALANCE = [(60, -0.5), (110, 3.5), (200, 0.5), (380, 2.5), (700, 9.5), (1290, 7), (2380, 1), (4400, 0),
                (8120, -2), (15000, 1.5)]


def scene():
    """The machine and the wind reach the two ports; the whistle joins them equally."""
    sound = machine() + idle() + short_events() + wind()
    half = LEFT_RIGHT / 2
    ports = undb(half * across(PORT_BALANCE)) * np.exp(1j * half * across(PORT_PHASE))
    return irfft(rfft(sound) * ports, N) + controller()


TOP_HZ = 15800


def record(dry):
    """The phone cuts the top with a steep low-pass."""
    return signal.sosfilt(signal.ellip(8, .2, 70, TOP_HZ, fs=SR, output="sos"), dry)


dry = scene()
out = record(dry)
persist_wave(out)
```